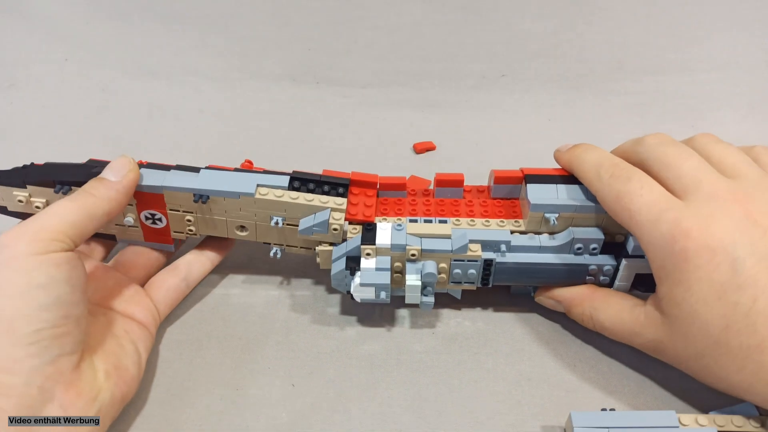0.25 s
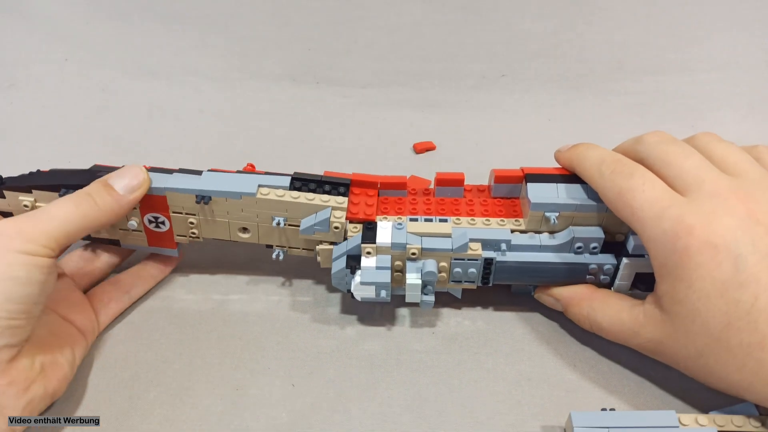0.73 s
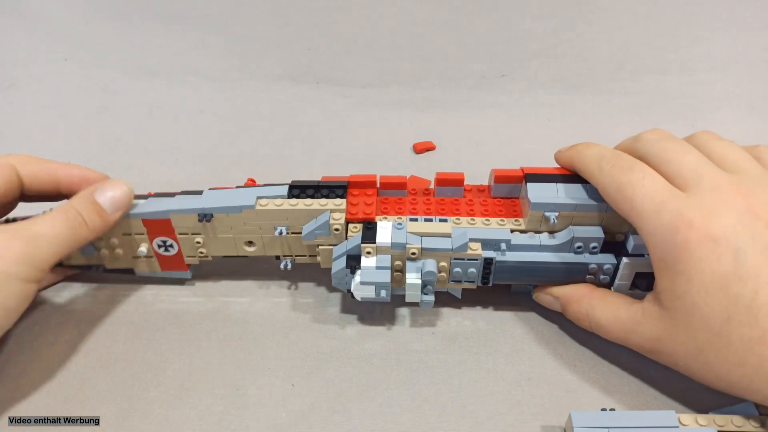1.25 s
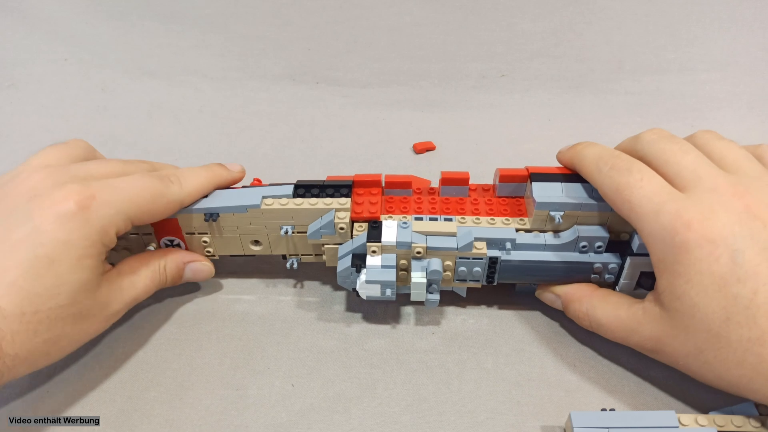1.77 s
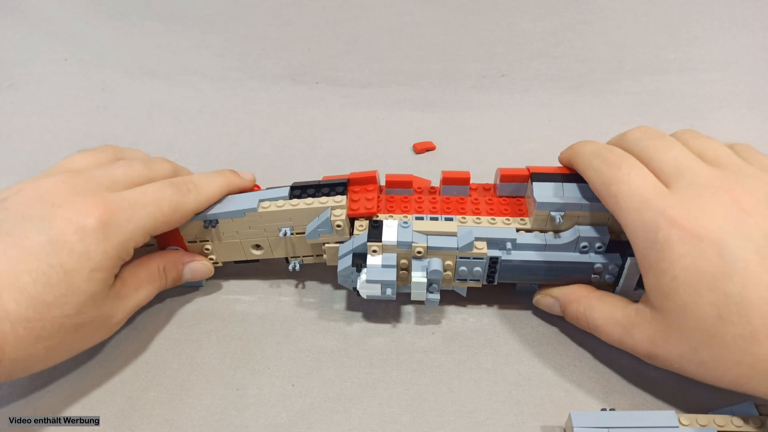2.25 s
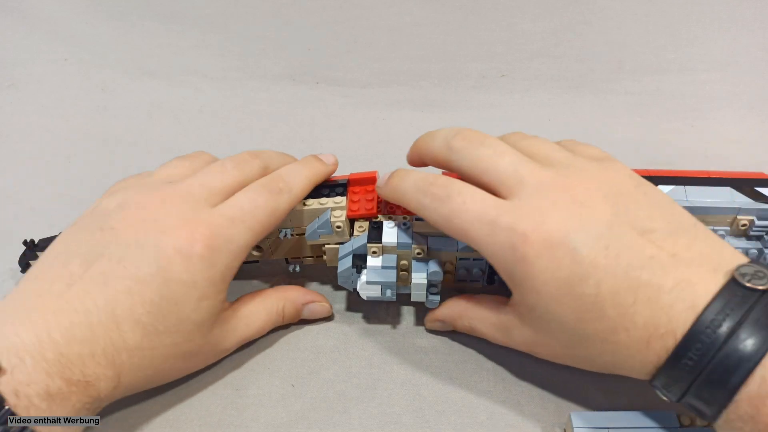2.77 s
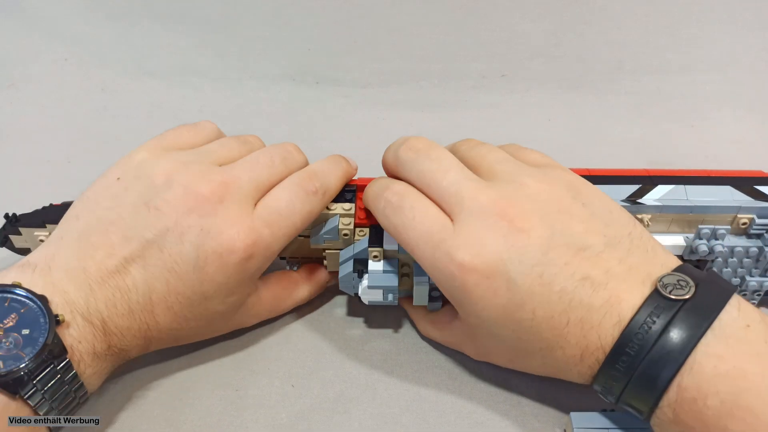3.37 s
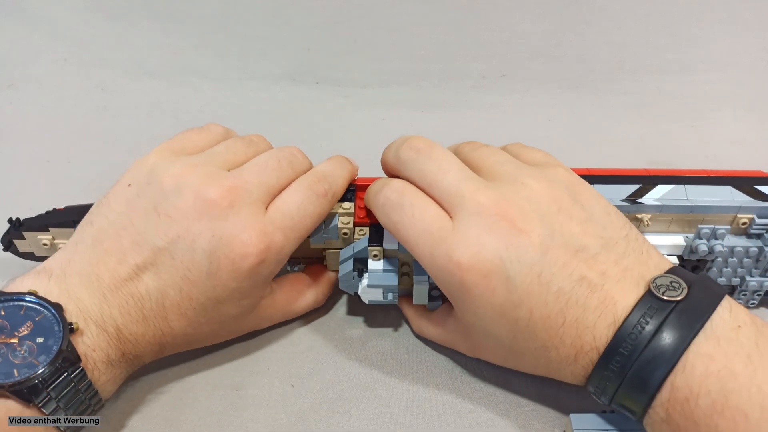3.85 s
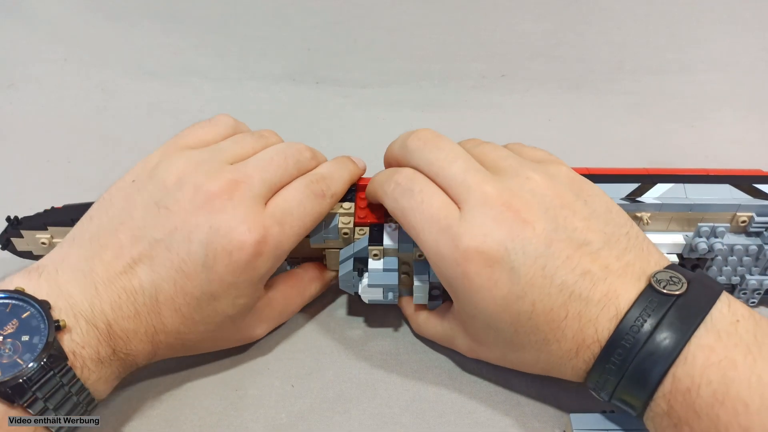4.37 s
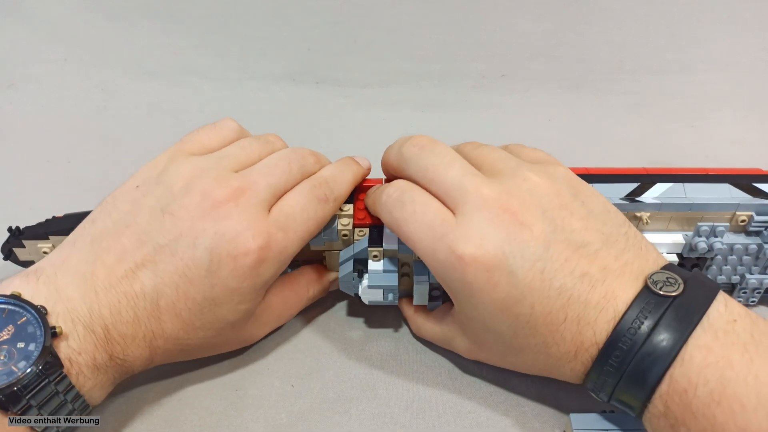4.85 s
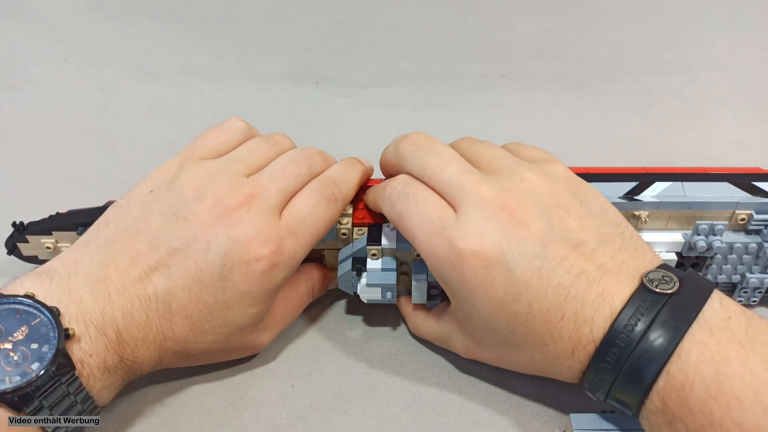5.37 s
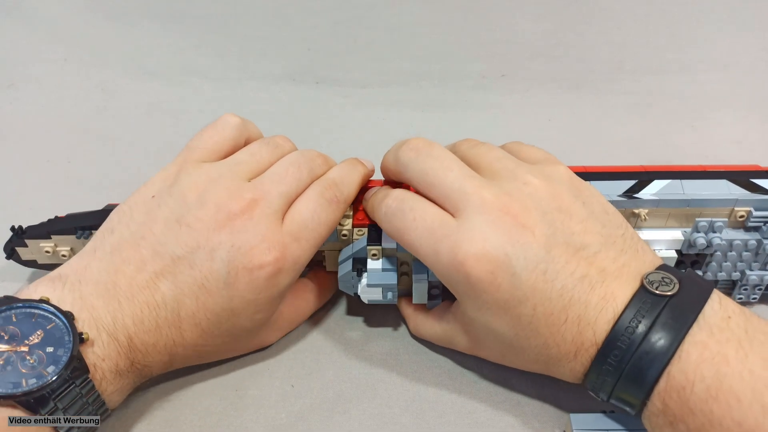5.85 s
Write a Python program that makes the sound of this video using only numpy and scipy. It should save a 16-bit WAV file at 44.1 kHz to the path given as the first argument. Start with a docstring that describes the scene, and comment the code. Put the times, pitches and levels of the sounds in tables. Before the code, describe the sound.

Hands press a long hollow model of plastic bricks on a table in a small, quiet room, heard close. Loud rattling snaps and deep thuds come first, then lighter clacks and hollow knocks in groups. Skin brushes dryly across studs, and the model groans in short low tones. The second half is much quieter, with isolated small clicks and one faint squeak over low rumble and hiss.

```python
"""Plastic studs snap and rattle close to a microphone as hands press a long model of bricks together on a
table. Each snap is a noise jolt with chatter after it, ringing the resonances of walls, plates, studs, cavities
and hull. The table top thuds as decaying sines and fingers creak against the table as short gliding tones.
Fingers slide over the studs as shaped noise and squeak once; mains hum, low rumble and hiss lie underneath."""
import sys
import numpy as np
from scipy import signal
from scipy.fft import rfft, irfft, next_fast_len
from scipy.io import wavfile
from scipy.ndimage import map_coordinates

SR = 44100
rng = np.random.default_rng(int(sys.argv[2]) if len(sys.argv) > 2 else 0)


def transcribe(signal):
    """Save signal, clipped to [-1, 1], as a 16-bit WAV file at the path in sys.argv[1]."""
    frames = np.atleast_2d(signal).T
    limited = np.clip(frames, -1, 1)
    pcm = np.round(limited * 32767).astype(np.int16)
    wavfile.write(sys.argv[1], SR, pcm)


N = 269822

# Noise bed. Spectra: pitch_hz, relative level_db (per Hz)
HISS_SPECTRUM = [(41, -28), (70, -3.5), (103, -11), (316, -25.5), (415, -21.5), (612, -29), (988, -26),
                 (2200, -30), (3090, -29.5), (14300, -31), (16400, -37)]
RUMBLE_SPECTRUM = [(20, -2), (30, 4.5), (42, -1), (52, -8.5), (62, -20), (75, -30)]
MAINS_HZ, HUM_DB, RUMBLE_DB, HISS_DB = 50, -57, -60, -67.5

# Room tail: pitch_hz, t60_s
ROOM_DECAY = [(300, 0.14), (2000, 0.2), (10000, 0.17)]
ROOM_DB = -9.5  # tail against the dry snap
TOP_HZ = 16400  # band limit of the whole mix

# Spectra of shaking table, shaking model and sliding skin: pitch_hz, relative level_db (per Hz)
TABLE_SPECTRUM = [(40, -54), (70, -3.5), (100, -12), (150, -13.5), (230, -29.5)]
MODEL_SPECTRUM = [(130, -50), (200, 2), (270, 1), (400, -3), (550, -7.5), (800, -19)]
RUB_SPECTRUM = [(1000, -17), (1700, -7), (2800, -4.5), (4000, -7.5), (5500, -27)]
BRUSH_SPECTRUM = [(3000, -35), (4500, -0.5), (6500, -1), (8200, -5), (10000, -17)]
FIZZ_SPECTRUM = [(6500, -24), (8500, -12.5), (10300, -9), (12000, -17.5), (15500, -28)]
SCUFF_SPECTRUM = [(450, -8), (700, -4.5), (1300, -10), (2000, -12.5)]

# Weight of the hands: time_s, table_shaking_db, model_shaking_db
HAND_WEIGHT = [(0, -47, -51.5), (.25, -58, -64), (.45, -79, -66), (.85, -73, -66.5), (1.05, -50, -66.5),
               (1.25, -59, -62.5), (1.5, -60, -57.5), (1.75, -50, -72), (2, -66.5, -70), (2.38, -59, -65.5),
               (2.52, -68, -65), (2.75, -61, -66.5), (3.1, -62, -63.5), (3.25, -58.5, -72),
               (3.41, -71, -67), (3.6, -71.5, -71.5), (4, -73, -71), (4.25, -79, -65.5), (4.5, -66, -78),
               (4.85, -76, -72), (5.32, -70, -69), (5.83, -83, -74.5), (6.12, -64, -67.5)]
SETTLE_TABLE_DB, SETTLE_MODEL_DB, SETTLE_T60_S = -17, -25, .5  # shaking after a thud, against its peak

# Fingertips sliding over the studs, the first row being the rattle dying away after the opening snaps: start_s,
# length_s, rub_db, swell_db (start to end), # brush_db, fizz_db, scuff_db (these three above the rub)
STROKES = [(0.134, 0.13, -69, -11, 2, -24, 5.5), (0.387, 0.39, -67.5, -4, 1, -1, -3),
           (0.922, .06, -73.5, -7, -2, -4.5, 1.5), (1.005, 0.19, -62.5, 2.5, 0.5, -0.5, -9),
           (1.224, 0.058, -54.5, 4, -3.5, -2, -6.5), (1.373, 0.019, -57.5, 1, -4, 3.5, -7),
           (1.437, 0.442, -70, 1, 2.5, -7, -2.5), (2.31, 0.23, -71, 0, -2.5, -7, 0.5),
           (2.56, 0.22, -69.5, -7, -1, -3.5, 4), (2.783, 0.049, -67, -2, 2, -7, -2),
           (2.867, 0.036, -70, -3, 1, -6, 1), (3.119, 0.098, -67.5, -11, -1.5, -10, 1),
           (4.23, 0.1, -76, -9.5, -8, -19, 8.5), (5.972, 0.18, -68.5, -6, -0.5, -4, -6)]
STROKE_ATTACK_S, STROKE_RELEASE_S = .035, .03
LINGER = .17  # share of a stroke's length added to its release
RESTING_DB = -77.5  # skin at rest still rustles faintly

# A fingertip squeak: time_s, level_db, pitch_hz
SQUEAK = [(4.23, -110, 2210), (4.26, -80, 2400), (4.3, -69, 2730), (4.33, -71, 2670), (4.36, -73, 2400),
          (4.41, -80, 2190), (4.45, -110, 2050)]

# The model bumps the table top: start_s, peak_db, pitch_hz, t60_s
THUDS = [(0.053, -15, 105.3, 0.05), (0.088, -23.5, 89, 0.049), (0.126, -37, 65.6, 0.15),
         (0.34, -46, 92, 0.11), (0.483, -32, 109, 0.11), (0.53, -32.5, 96.5, 0.089),
         (0.558, -38, 149, 0.23), (0.64, -32.5, 116.5, 0.18), (0.68, -37, 136.7, 0.23),
         (0.718, -42, 86, 0.17), (1.038, -39.5, 135.3, 0.29), (1.092, -34.5, 126.6, 0.11),
         (1.279, -33.5, 97.7, .32), (1.326, -26, 89, .11), (1.436, -42.5, 90.6, 0.076),
         (1.589, -44.5, 97, .13), (1.686, -33.5, 87, 0.071), (2.145, -50.5, 68, 0.13),
         (2.387, -49, 68.5, 0.085), (2.708, -44.5, 95, 0.084), (2.985, -34.5, 98.4, 0.16),
         (3.046, -41, 91, .092), (3.375, -58, 71, .16), (4.078, -49.5, 100.5, 0.25),
         (4.127, -50, 97.5, 0.1), (4.222, -49, 91, .073), (4.295, -45, 65, 0.095), (4.472, -40.5, 65, 0.11),
         (4.589, -40.5, 68, 0.041), (4.62, -42.5, 94.5, 0.076), (5.13, -46, 69, 0.03), (5.8, -47, 97, .18)]
THUD_RISE_S = .0056

# Low creaks of fingers against the table: start_s, peak_db, first_pitch_hz, last_pitch_hz, length_s
CREAKS = [(1.385, -43.5, 271, 233, 0.054), (1.485, -41.5, 278, 215, 0.11), (1.664, -41.5, 225, 288, 0.033),
          (1.726, -45.5, 240, 264, 0.021), (1.748, -46.5, 234, 290, 0.029), (1.795, -43, 194, 290, 0.025),
          (1.83, -44.5, 185, 278, 0.029), (1.861, -48, 220, 288, 0.019), (1.929, -56, 216, 290, 0.038),
          (2.028, -50, 197, 302, 0.021), (2.11, -57, 220, 270, 0.021), (2.156, -52.5, 240, 273, 0.017),
          (2.214, -53, 250, 258, 0.042), (2.271, -59, 250, 250, 0.042), (2.462, -51.5, 268, 270, 0.018)]

# Studs snapping: start_s, snap_db, bend_db, knock_db (hull bend and hollow knock above the snap), knock_hz,
# plate_db, tick_db (plate clack and bright tick above the snap), rattle_t60_s (before each part's own speed)
SNAPS = [(.033, -23, -15.5, -10.5, 950, -7.5, -4.5, 0.068), (0.0516, -24, -0.5, -3, 482, -3, 9.5, .03),
         (0.0798, -37.5, 8.5, 1.5, 479, -7, -6, 0.025), (.13, -24.5, -28, -5.5, 585, -5, 4, 0.051),
         (.155, -32.5, 1.5, -5.5, 563, -13, 5, 0.039), (0.166, -41.5, -8, -7, 479, -9, 9, 0.02),
         (0.185, -50, 12.5, -5, 553, -13, -5, 0.023), (0.2997, -47, -6, -22, 530, 3.5, 7, 0.0051),
         (0.4834, -41, -5, -8.5, 479, -3, 5.5, .06), (0.527, -44.5, 6, 5, 472, -4, 0, 0.044),
         (0.5573, -44.5, 8.5, 8, 545, -1, -1, 0.052), (0.6258, -52, 8.5, 0, 494, -7, -6, .04),
         (.6459, -36, -12, -1, 530, 4.5, 2, 0.084), (0.6722, -36, -3, -4.5, 470, -10, 6, 0.1),
         (.7153, -54, 13, 9.5, 527, 0.5, -11, 0.08), (1.0367, -42, 1.5, 4, 507, 1, 0, 0.062),
         (1.0937, -48.5, 0, 5, 506, -5, -16, 0.11), (1.2832, -47.5, 11.5, 9, 482, -13, -7, 0.16),
         (1.3081, -43, 9, 14, 493, -5, 1, 0.038), (1.3215, -39.5, 11.5, 12.5, 484, 3.5, 6.5, 0.062),
         (1.3314, -43, 13.5, 12, 472, -9, -3, 0.089), (1.585, -56.5, -1, 5, 550, 3, 4, .044),
         (1.6267, -53.5, 5, 17.5, 463, 6, 2.5, 0.052), (1.69, -56.5, 12, 1, 487, 1, -7, .05),
         (1.769, -69.5, 21, 18, 517, -7, -3, 0.032), (1.8956, -51, -1, 9.5, 597, -7, -18, 0.094),
         (2.2214, -53, -2, -4.5, 549, -5, 2.5, 0.044), (2.7127, -56, 18, 9, 555, -17, -6, 0.074),
         (2.8832, -58, 2, -1, 538, -7, -9, .03), (2.9726, -53.5, -17, -14, 423, -2, -6, .04),
         (2.9798, -44, 5, 9.5, 774, 1.5, -4.5, 0.035), (3.048, -58.5, 18, 10, 444, -8, 6, 0.1),
         (3.105, -40.5, -3.5, -3, 511, 3.5, -1, 0.068), (3.1124, -44.5, -15, 3.5, 864, -2, -3, 0.032),
         (3.1236, -43.5, -6, -7, 552, -21, -6, 0.093), (3.1438, -48, -22, -7, 888, -8, -11, 0.11),
         (3.1695, -52.5, -5, -15, 993, -13, -3, 0.068), (3.195, -56, -5, -11, 533, -13, -9, 0.1),
         (3.264, -40.5, -12, -3, 1110, -10, -18, 0.0084), (3.378, -54.5, 3.5, -6, 423, -4, -2, 0.095),
         (3.6488, -62, -10, 2, 495, -15, 4, 0.14), (3.879, -69.5, 11, 18, 570, -6, -4, 0.036),
         (3.9955, -68, -1, 18.5, 640, -11, -6, 0.017), (4.0823, -58.5, 15, 12.5, 431, -1, -8, 0.025),
         (4.114, -59.5, 10, 1, 439, -11, -3, 0.15), (4.147, -58, 10, 7, 920, 5.5, -6, 0.041),
         (4.2295, -54.5, 6, 1.5, 450, -3, -4, .05), (4.293, -62, 11.5, -17, 439, -16, -11, 0.11),
         (4.3486, -58.5, 6.5, -3.5, 423, -18, -9, 0.03), (4.421, -72, 17.5, -3, 611, -6, -4, 0.032),
         (4.6136, -68, 14, 12, 436, 14.5, 9, 0.046), (4.7017, -59.5, -23, -9, 549, -0.5, -2, 0.1),
         (5.0043, -69.5, 4, 10, 423, -7, 12, 0.11), (5.0819, -52, -12, 0.5, 960, 2.5, -19, 0.034),
         (5.1285, -63.5, 7, -4, 528, -8, 5, .05), (5.2612, -71, 16.5, 22.5, 497, -9, -5, 0.024),
         (5.43, -72.5, 10, 12, 440, -3, -1, 0.04), (5.4614, -55.5, -6, -4, 586, 4.5, 6, 0.036),
         (5.5054, -56.5, -1, -3, 420, 3, 14, 0.021), (5.605, -72.5, 12, -2, 1190, 9, 19, 0.055),
         (5.7467, -48.5, -9, -2.5, 566, 0, -4, 0.044), (5.8043, -51.5, 6, -4, 423, -0.5, 4.5, 0.091),
         (6.0646, -60, -9, 5, 568, 3, 8, 0.059)]
RATTLE_DB, JOLT_T60_S = -3, .0076  # rattle against the jolt; decay of the jolt
WALL_HZ, PLATE_HZ, TICK_HZ = 2020, 3650, 7440  # favoured pitches
OCTAVES_PER_DB = .2  # a stronger tick favours smaller plates
LIGHT_DB, LIGHT_OCTAVES_PER_DB = -52, .02  # the lighter a snap under this level, the higher its tick

# Resonances of the model's parts: pitch_hz, width_hz, level_db
WALL_MODES = [(1463, 990, -3), (1695, 215, 2), (2020, 240, 3), (2134, 400, 1.5), (2454, 290, -2.5)]  # long brick walls
PLATE_MODES = [(2774, 300, 2), (3294, 420, 0), (3950, 490, -1.5), (4300, 440, -2), (4490, 590, -3.5)]  # small plates
STUD_MODES = [(5940, 1160, -11.5), (7880, 850, -2.5), (7860, 4700, -8.5), (10200, 2900, -2),
              (12500, 2500, -6)]  # studs and edges
HOLLOW_MODES = [(503.4, 79, 6), (546, 69, 6), (757, 75, 1.5), (911, 98, 4), (1208, 280, 4.5)]  # cavities
HULL_MODES = [(201, 56, -1.5), (265.7, 13.8, 0.5), (334.4, 35, 1)]  # the whole model bending


def amp(db):
    """Gain of a level in dB."""
    return 10 ** (np.asarray(db) / 20)


def unit(x):
    """x at rms 1."""
    return x / np.sqrt(np.mean(x ** 2) + 1e-20)


def along(points, hz):
    """Reads (Hz, value) points on a log frequency axis."""
    f, value = np.transpose(points)
    return np.interp(np.log(hz + 1), np.log(f + 1), value)


def curves(rows):
    """Automation curves: one value per sample for each column after the time."""
    s, *columns = np.transpose(rows)
    return [np.interp(np.arange(N) / SR, s, column) for column in columns]


def wobble(rate):
    """A smooth random curve with rate knots a second."""
    knots = rng.standard_normal(int(N * rate / SR) + 4)
    return map_coordinates(knots, [np.arange(N) * rate / SR])


def filtered(x, response):
    """x times a complex response of frequency."""
    size = next_fast_len(len(x) + 4096)
    spectrum = rfft(x, size) * response(np.fft.rfftfreq(size, 1 / SR))
    return irfft(spectrum, size)[:len(x)]


def noise(spectrum):
    """Coloured noise of rms 1, falling away steeply outside the given points."""
    points = [(spectrum[0][0] / 2, -120), *spectrum, (spectrum[-1][0] * 2, -120)]
    return unit(filtered(rng.standard_normal(N), lambda hz: amp(along(points, hz))))


def add(track, s, x):
    """Mixes x into track from time s."""
    part = track[round(s * SR):][:len(x)]
    part += x[:len(part)]


def background():
    """A drifting mains sine, low rumble and microphone hiss as steady coloured noise."""
    phase = 2 * np.pi * MAINS_HZ * np.arange(N) / SR + .4 * wobble(6)
    hum = amp(wobble(5)) * np.sin(phase)
    return amp(HUM_DB) * hum + amp(RUMBLE_DB) * noise(RUMBLE_SPECTRUM) + amp(HISS_DB) * noise(HISS_SPECTRUM)


def settling():
    """Gain of the decaying shaking that each thud leaves behind, summed as power."""
    power, t = np.zeros(N), np.arange(SR) / SR
    for s, db, *_ in THUDS:
        add(power, s, amp(db - 60 * t / SETTLE_T60_S) ** 2)
    return np.sqrt(power)


def shaking_hands():
    """Shifting weight and thuds shake table and model, heard as lumpy low noise."""
    (table, model), after_thuds = amp(curves(HAND_WEIGHT)), settling()
    table_gain = np.hypot(table, amp(SETTLE_TABLE_DB) * after_thuds)
    model_gain = np.hypot(model, amp(SETTLE_MODEL_DB) * after_thuds)
    return table_gain * lumpy(TABLE_SPECTRUM) + model_gain * lumpy(MODEL_SPECTRUM)


def lumpy(spectrum):
    """Coloured noise of rms 1 whose level wanders unevenly."""
    return unit(amp(2 * wobble(25)) * noise(spectrum))


def stroke_gains():
    """Gains of rub, brush, fizz and scuff: each stroke sets in, swells or sinks, and lets go."""
    t = np.arange(N) / SR
    gains = amp(RESTING_DB) * amp([[0], [0], [-6], [0]]) * np.ones(N)
    for s, length, db, swell_db, brush_db, fizz_db, scuff_db in STROKES:
        fade_in = 1 + (t - s) / STROKE_ATTACK_S  # full at the start time
        fade_out = 1 + (s + length - t) / (STROKE_RELEASE_S + LINGER * length)
        touch = np.clip(np.minimum(fade_in, fade_out), 0, 1)
        swell = amp(swell_db * np.clip((t - s) / length - .5, -.5, .5))
        levels = amp(db) * amp([[0], [brush_db], [fizz_db], [scuff_db]])
        gains = np.maximum(gains, levels * touch * swell)
    return gains


def sliding_fingers():
    """Skin over studs scuffs low and rustles in grainy bands of noise."""
    rub, brush, fizz, scuff = stroke_gains()
    grain = amp(1.2 * wobble(12) + wobble(40) + wobble(300))
    rustle = rub * unit(grain * noise(RUB_SPECTRUM))
    rustle += brush * unit(grain * noise(BRUSH_SPECTRUM))
    rustle += fizz * unit(grain * noise(FIZZ_SPECTRUM))
    return rustle + scuff * lumpy(SCUFF_SPECTRUM)


def squeak():
    """A fingertip squeaks once: two tones, rough in pitch and level."""
    db, hz = curves(SQUEAK)
    turn = 2 * np.pi * np.cumsum(hz + 55 * wobble(300)) / SR
    tones = np.sin(turn) + .67 * np.sin(.76 * turn)
    return amp(db + 2.9 * wobble(100)) * tones


def creaks():
    """Short rounded tones whose pitch slides as the load changes."""
    out = np.zeros(N)
    for s, db, first_hz, last_hz, length in CREAKS:
        u = np.arange(round(length * SR)) / (length * SR)  # progress, 0 to 1
        hz = first_hz + (last_hz - first_hz) * u
        turn = 2 * np.pi * np.cumsum(hz) / SR + rng.uniform(0, 2 * np.pi)
        add(out, s, amp(db) * np.sin(np.pi * u) ** .93 * np.sin(turn))
    return out


def thuds():
    """The table top swings a few cycles from a soft start; a weaker overtone dies slightly more slowly."""
    out, t = np.zeros(N), np.arange(SR // 3) / SR
    for s, db, hz, t60 in THUDS:
        fade_db = -60 * t / np.clip(t60, .03, .4)
        swing = amp(fade_db) * np.sin(2 * np.pi * hz * t)
        swing += .3 * amp(.87 * fade_db) * np.sin(2 * np.pi * 1.586 * hz * t)
        swing *= 1 - np.exp(-(t / THUD_RISE_S) ** 2)  # soft contact
        add(out, s, amp(db) * swing / np.abs(swing).max())
    return out


def nearest(modes, favoured_hz, slope_db):
    """The modes nearest the blow's own pitch speak most; the rest drop by slope_db an octave."""
    return [(hz, w, db - slope_db * abs(np.log2(hz / favoured_hz))) for hz, w, db in modes]


def rung(force, modes, limit_hz=np.inf):
    """A force through resonances of slightly new strength and pitch each time, at peak 1."""
    chance = rng.standard_normal((len(modes), 2)) * [2.5, .04]  # dB, share of pitch
    parts = []
    for k, ((hz, width, db), (more_db, detune)) in enumerate(zip(modes, chance)):
        parts.append(((-1) ** k * amp(db + more_db), hz * (1 + detune), width))
    top_hz = 1.3 * modes[-1][0]  # little is radiated above the highest mode

    def response(f):
        ring = sum(g * 1j * f * w / (c * c - f * f + 1j * f * w) for g, c, w in parts)
        return ring / ((1 + 1j * f / top_hz) * (1 + 1j * f / limit_hz) ** 2) ** 2

    x = filtered(force, response)
    return x / np.abs(x).max()


def jolt(t, chatter, t60):
    """Noise under a sharp hit and a longer, uneven rattle of loose bricks."""
    rattle = chatter * amp(RATTLE_DB - 60 * t / t60)
    return rng.standard_normal(len(t)) * (amp(-60 * t / JOLT_T60_S) + rattle)


def room(x):
    """One new noise tail; each frequency dies at its own speed."""
    hz, t, z = signal.stft(rng.standard_normal(SR // 3), SR, nperseg=256)
    fade = amp(-60 * t / along(ROOM_DECAY, hz)[:, None])
    tail = signal.istft(z * fade, SR, nperseg=256)[1]
    return signal.fftconvolve(np.pad(x, (130, 0)), tail / np.linalg.norm(tail))  # 130 samples of pre-delay


def snaps():
    """A sharp jolt, then loose bricks chatter on; walls, plates, studs, cavities and hull ring with it."""
    out, t = np.zeros(N), np.arange(SR // 6) / SR
    for s, db, bend_db, knock_db, knock_hz, plate_db, tick_db, t60 in SNAPS:
        t60 = np.clip(t60, .005, .3)
        plate_hz = PLATE_HZ * 2 ** (OCTAVES_PER_DB * tick_db)
        tick_hz = TICK_HZ * 2 ** (LIGHT_OCTAVES_PER_DB * max(LIGHT_DB - db, 0))
        # tiny contacts of uneven size, each held for 50 samples
        contacts = np.repeat(rng.standard_normal(len(t) // 50 + 1), 50)[:len(t)]
        chatter = amp(3 * contacts)

        # the rattle dies at its own speed in each part
        walls = rung(jolt(t, chatter, t60 / .99), nearest(WALL_MODES, WALL_HZ, slope_db=7.5))
        plates = rung(jolt(t, chatter, t60 / .91), nearest(PLATE_MODES, plate_hz, slope_db=12))
        stud_modes = nearest(STUD_MODES, tick_hz, slope_db=9)
        studs = rung(jolt(t, chatter, t60 / 1.8), stud_modes, limit_hz=1.3 * tick_hz)
        hollow = rung(jolt(t, chatter, t60 / .52), nearest(HOLLOW_MODES, knock_hz, slope_db=13.5))
        hull = rung(jolt(t, chatter, t60 / .74), HULL_MODES)

        dry_snap = walls + amp(plate_db) * plates + amp(tick_db) * studs
        dry_snap += amp(knock_db) * hollow + amp(bend_db) * hull
        add(out, s, amp(db) * dry_snap)
        add(out, s, amp(db + ROOM_DB) * room(dry_snap))
    return out


def scene():
    """All sources at one microphone."""
    hands = shaking_hands() + sliding_fingers() + squeak()
    return (background() + hands + creaks() + thuds() + snaps())[None]


def record(dry):
    """Nothing is kept above the band limit."""
    return filtered(dry[0], lambda hz: hz < TOP_HZ)[None]


dry = scene()
out = record(dry)
transcribe(out)
```